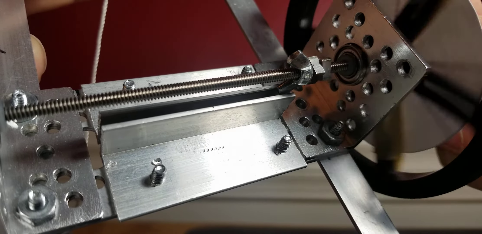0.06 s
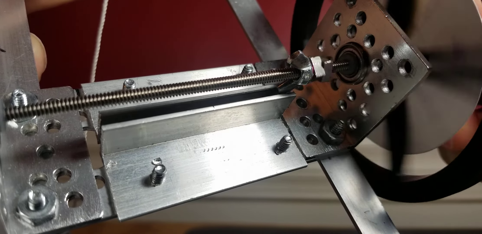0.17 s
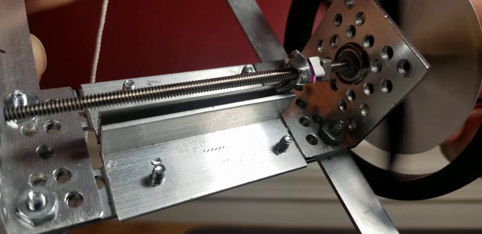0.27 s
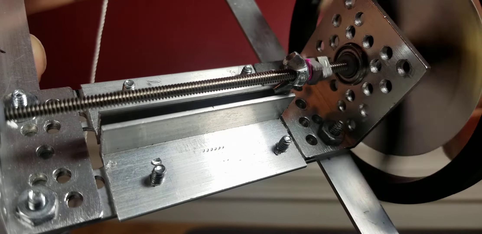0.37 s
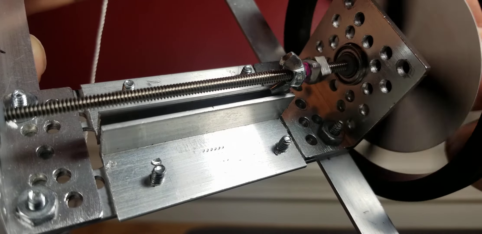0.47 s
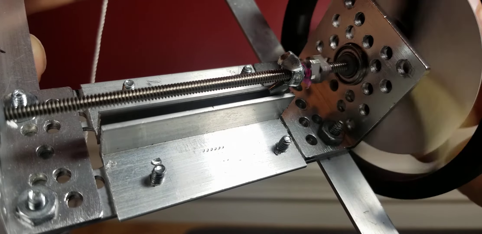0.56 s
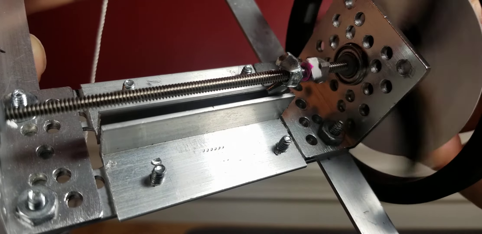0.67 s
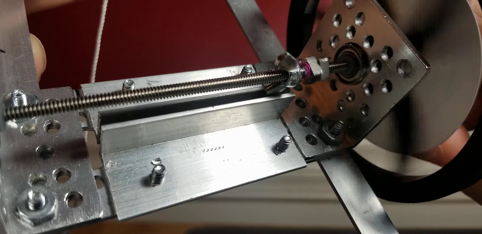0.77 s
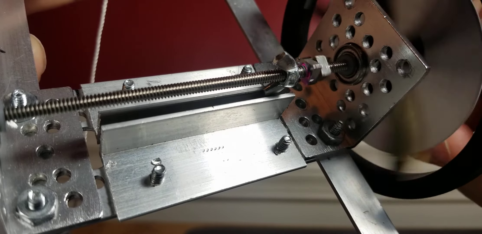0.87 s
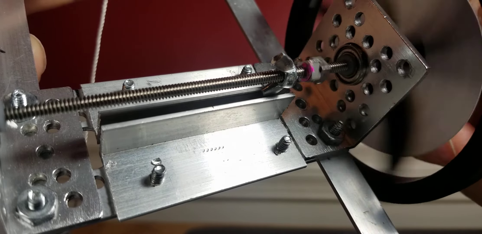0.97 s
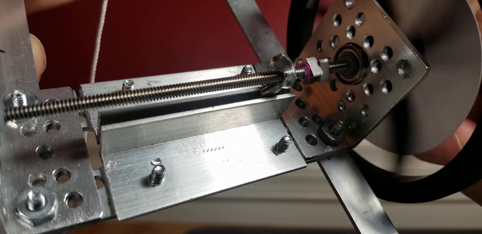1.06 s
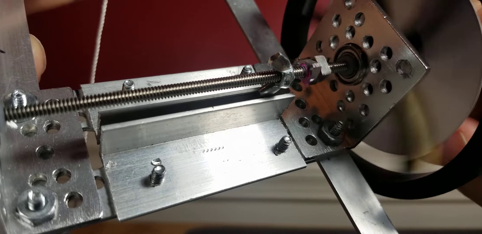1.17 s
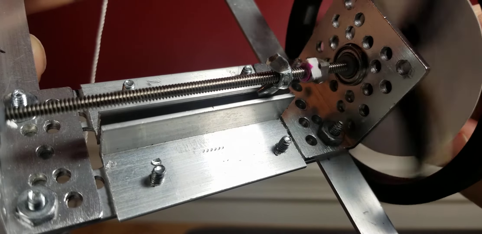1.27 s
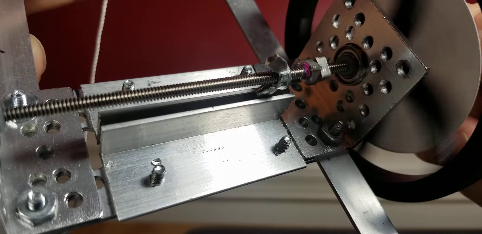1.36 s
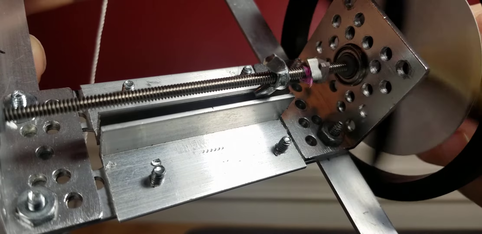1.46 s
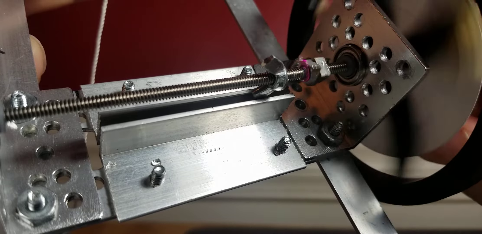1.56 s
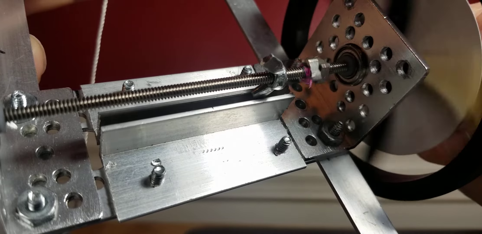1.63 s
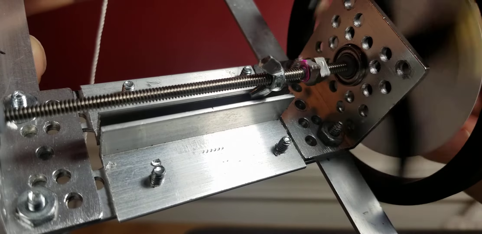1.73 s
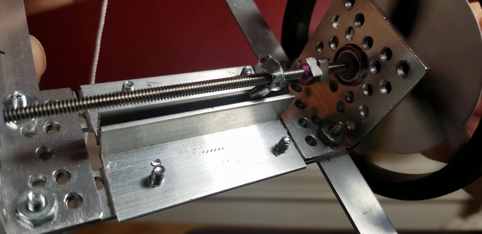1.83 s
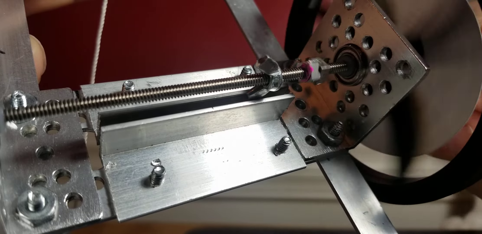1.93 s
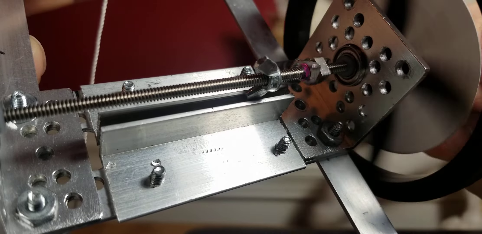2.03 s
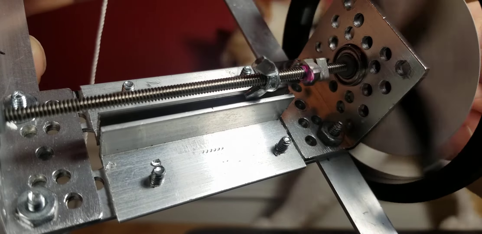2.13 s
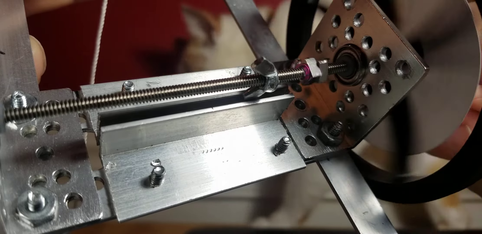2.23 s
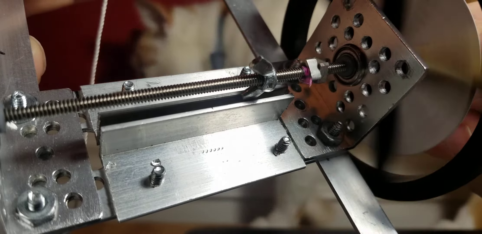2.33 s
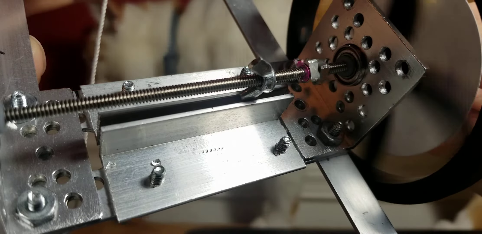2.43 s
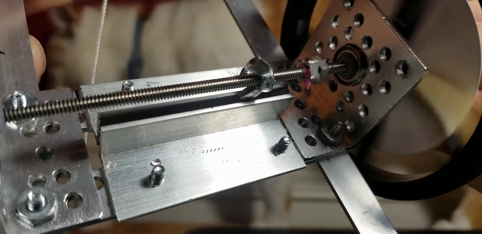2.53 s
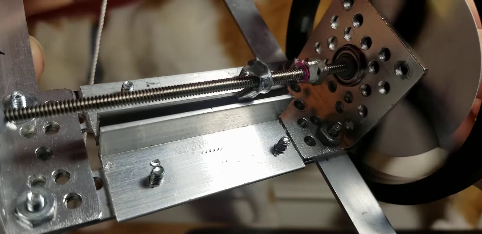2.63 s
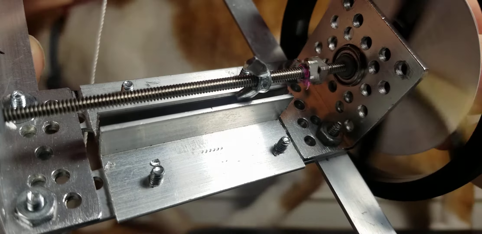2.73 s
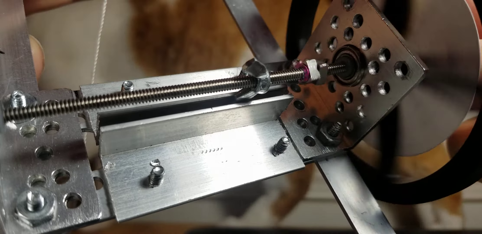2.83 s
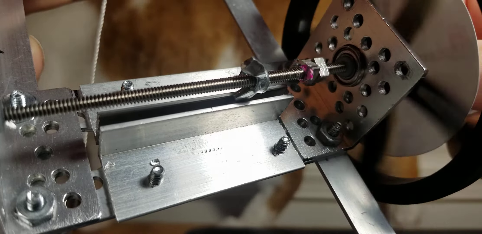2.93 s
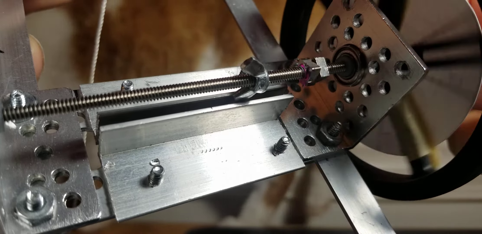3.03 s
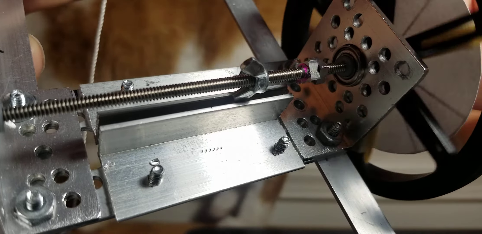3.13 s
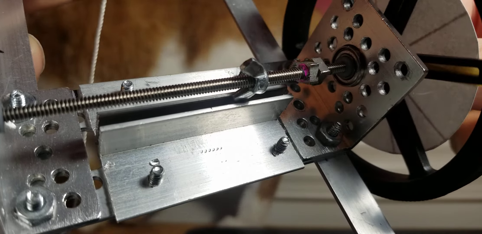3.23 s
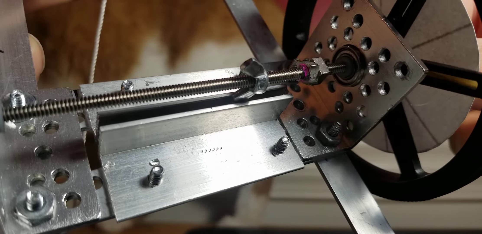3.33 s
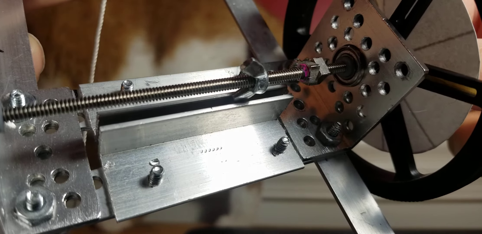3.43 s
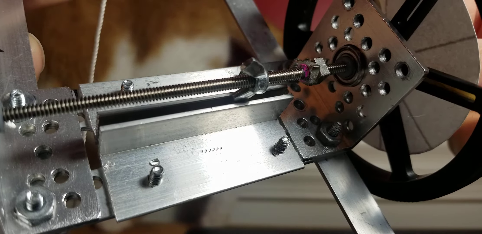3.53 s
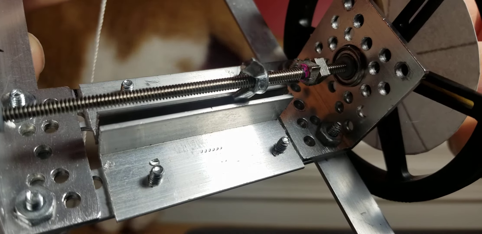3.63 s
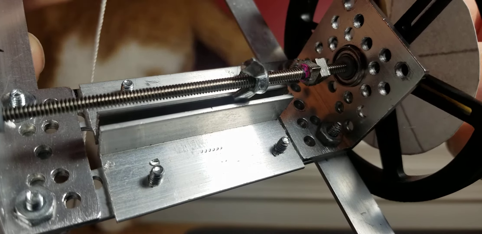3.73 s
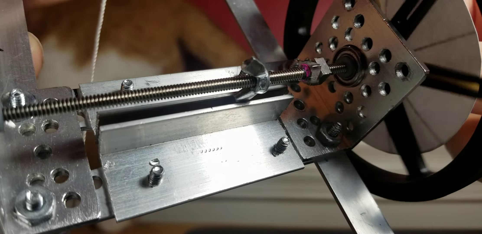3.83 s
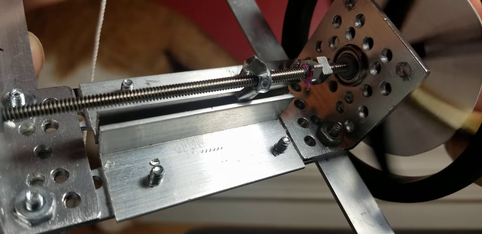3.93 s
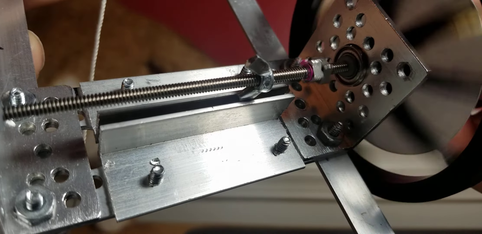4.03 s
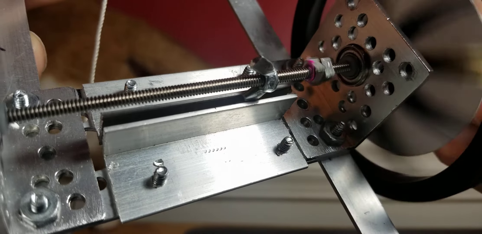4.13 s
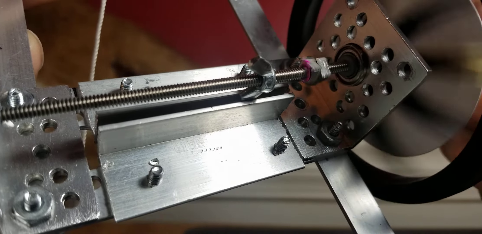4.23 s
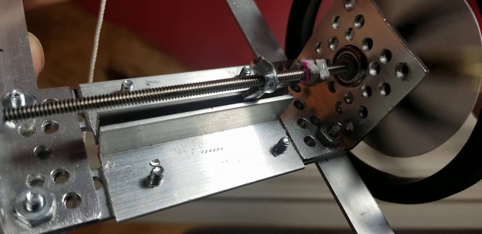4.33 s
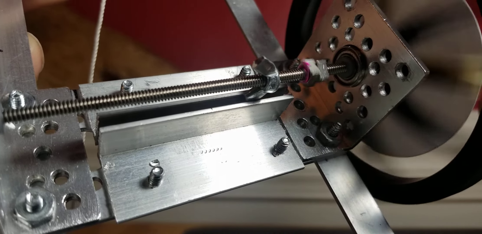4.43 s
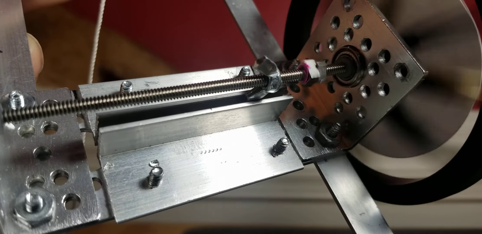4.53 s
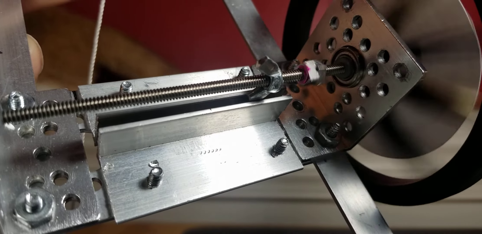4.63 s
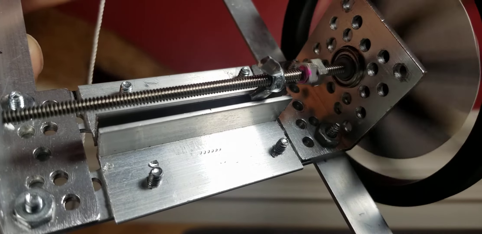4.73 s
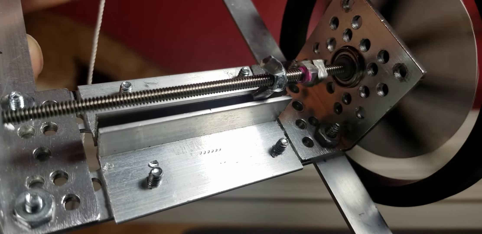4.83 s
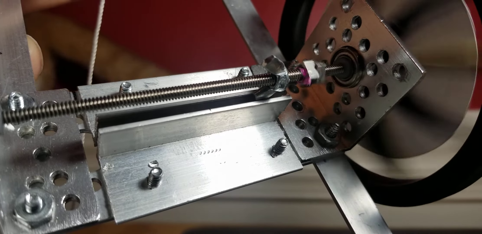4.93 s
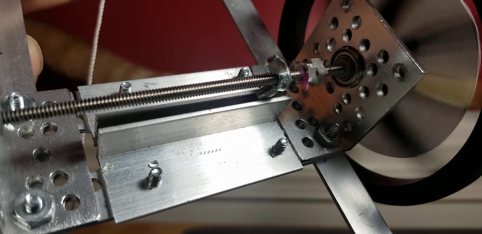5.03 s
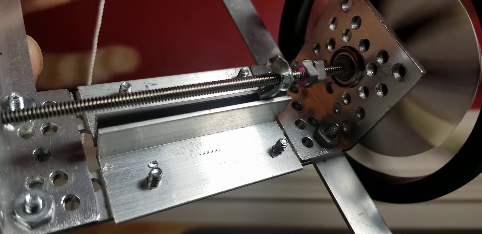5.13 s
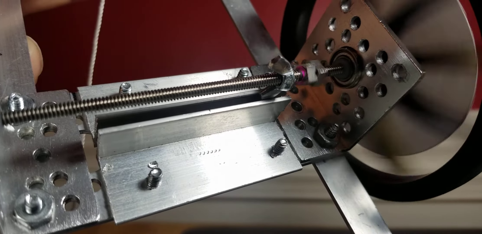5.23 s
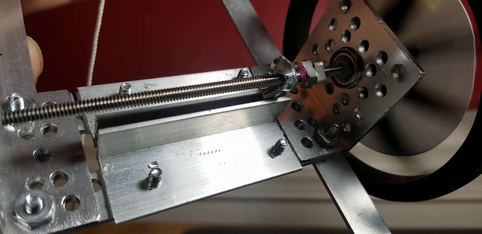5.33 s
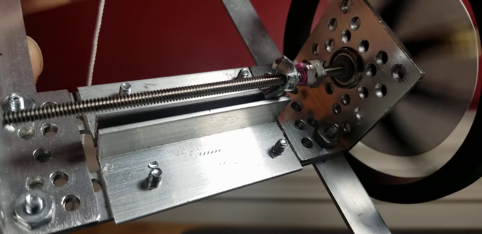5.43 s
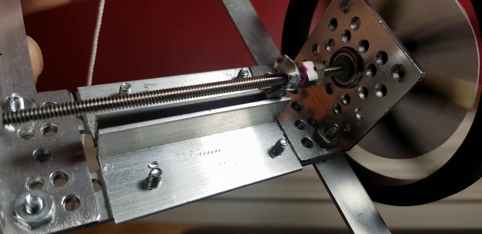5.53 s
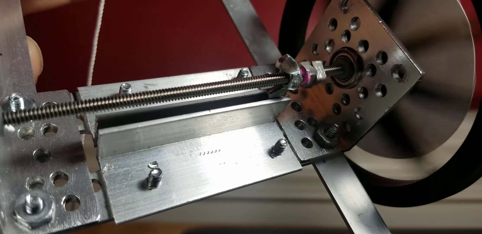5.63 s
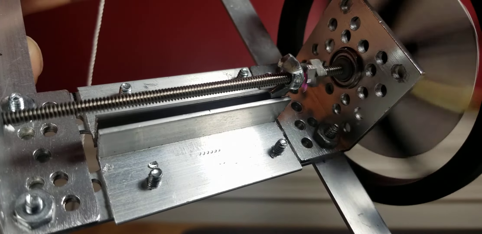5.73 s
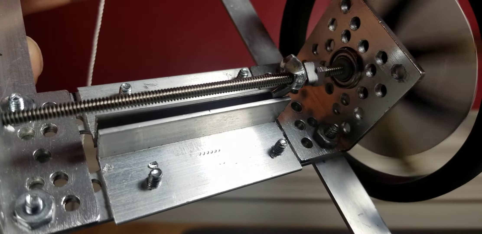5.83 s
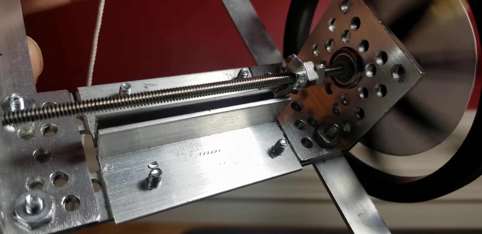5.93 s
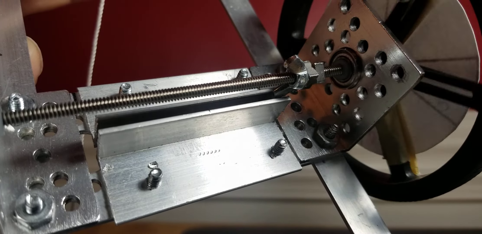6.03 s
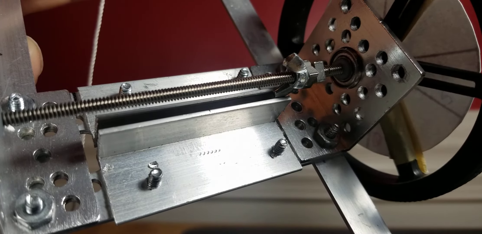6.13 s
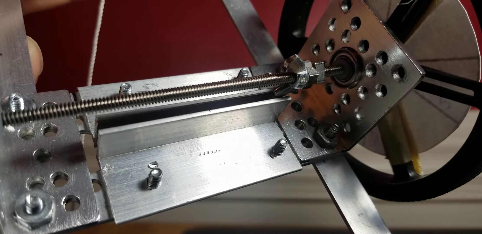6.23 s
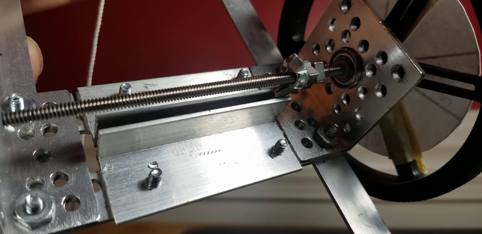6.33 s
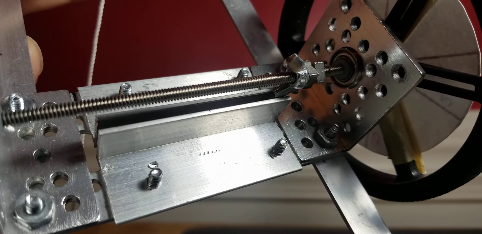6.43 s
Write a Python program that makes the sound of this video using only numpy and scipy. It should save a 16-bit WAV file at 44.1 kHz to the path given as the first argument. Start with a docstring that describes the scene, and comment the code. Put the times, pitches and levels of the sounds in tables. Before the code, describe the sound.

A small wheel and threaded axle whirr in their bearings, close to the microphone in a small indoor space. After handling thumps and light ticks comes a dense metal rattle of just over a second, then softer coasting with sharp clicks. After a near-still pause, friction noise glides down and a second, longer rattle runs in broken bursts before becoming continuous. It stops abruptly, with a double-tick knock and quiet.

```python
"""Indoors and close by, in stereo, a small wheel on a threaded rod spins one way, stops, and spins back.
A loose nut strikes the thread in trains of blows that ring the metal frame; sharp ticks ring it too.
Bearings hiss and whirr as filtered noise, friction noise glides between the spins, and the hand-held
rig rumbles as resonant noise and thumps as dying low swings. A knock follows the last spin.
Sparse echoes return the metal sounds over soft air hiss, a faint room floor and a thin high whine."""
import sys
import numpy as np
from scipy import signal
from scipy.fft import rfft, irfft
from scipy.io import wavfile
from scipy.ndimage import uniform_filter1d

SR = 44100
rng = np.random.default_rng(int(sys.argv[2]) if len(sys.argv) > 2 else 0)


def generate_wav(sig):
    """Save sig (samples, or channels by samples) to the path in sys.argv[1] as 16-bit PCM at SR."""
    pcm = np.round(np.clip(np.atleast_2d(sig).T, -1, 1) * 32767).astype(np.int16)
    wavfile.write(sys.argv[1], SR, pcm)


def decibels_to_gain(level_db):
    """Convert a level in decibels to a linear amplitude gain (20 dB per decade)."""
    exponent = np.asarray(level_db, float) / 20
    return 10 ** exponent


N = 286209  # samples
TURN_BACK_S = 3.5  # forward settings before, back settings after

# room floor spectrum: frequency_hz, relative_db
FLOOR_COLOUR = [(300, -9.5), (900, -23), (5000, -29), (9500, -31.5), (12500, -17.5), (16000, -22.5)]
FLOOR_DB = -82
# faint high whine, one list for each stretch: time_s, pitch_hz, level_db
WHINE_PATHS = [
    [(0, 13300, -80), (.73, 13280, -79)],
    [(6.1, 13520, -92), (6.49, 13640, -90)],
]
# soft background hiss, swelling in and dying at the end: time_s, relative level_db
AIR_HISS = [(0, -67), (.32, -59.5), (.73, -60.5), (2.8, -60.5), (3.3, -58.5), (3.85, -65), (5.88, -56),
            (5.97, -67), (6.07, -64), (6.22, -86), (6.49, -100)]
# spectrum of the soft background hiss: frequency_hz, relative_db
AIR_COLOUR = [(350, -46.5), (600, -1.5), (834, -30), (944, -10), (1550, -9.5), (2720, -6), (3250, -8),
              (4200, -2.5), (5710, 1), (9110, -7), (16000, -9)]
# unsteadiness of the hand: time_s, level_db
HAND = [(0, -43), (.14, -48), (.4, -54), (.6, -50), (1.0, -44), (1.25, -48), (1.48, -53), (1.65, -44),
        (1.85, -56), (2.33, -54), (2.6, -59), (3.1, -62), (3.75, -66), (4.05, -51), (4.35, -59), (4.7, -57),
        (5.9, -54), (6.2, -68), (6.49, -80)]
# deep resonances of the hand-held rig: pitch_hz, width_hz, relative_db
DEEP_MODES = [(54.8, 5.3, 4), (91, 41, -10), (34.7, 22, -8)]
# body resonances of the hand-held rig: pitch_hz, width_hz, relative_db
BODY_MODES = [(131, 81, 2), (197.3, 9.3, -0.5), (300, 40, -6), (400, 25, -12.5), (527, 40, -24.5),
              (900, 980, -47.5)]
# rumble at a middling hand (STEADY_DB): forward and back levels, before the ear balance
STEADY_DB, DEEP_DB, BODY_DB = -55, (-53.5, -57), (-57.5, -56)
DEEP_FOLLOW, BODY_FOLLOW, LUMP_DB = .45, 1.05, 2.2  # dB per dB of hand (twice); rms of random lumps
DEEP_UNDER_HZ = 110  # thumps below this stir the deep part
SHAKE_DB, SHAKE_T60_S = -18, .5  # shaking left by a thump, relative to the thump
SCUFF_DB, SCUFF_T60_S = -52, .7  # the grip shifts at the start
# spectrum of the grip scuff: frequency_hz, relative_db
SCUFF_COLOUR = [(150, -30), (400, 0), (700, -2), (1500, -8), (3000, -15), (4000, -40), (16000, -60)]
# bearings under load: start_s, end_s, relative hiss level_db
LOADED_SPANS = [(.74, 1.995, -45), (3.938, 5.868, -44.5)]
LOAD_RISE_S, LET_GO_S = .02, .01
# how hard the shaft runs in its bearings: time_s, strength (its square scales the whirr)
SHAFT_RUN = [(0, .45), (.25, .5), (.44, .95), (.73, .8), (.8, 1.15), (1.8, 1.05), (2.0, .5), (2.98, .5),
             (3.28, .13), (3.75, .15), (3.93, .47), (4.06, 1.3), (4.5, .95), (5.83, 1.1), (5.9, .65),
             (6.07, .27), (6.2, .07)]
# spectrum of the bearing hiss under load: frequency_hz, relative_db
LOADED_COLOUR = [(350, -40), (600, -3), (834, -30), (1000, -10), (1400, -12), (2000, -8), (2720, -6),
                 (3300, -7), (4200, -4), (5710, 1.5), (9110, -7), (16000, -4.5)]
WHIRR_DB, GRIT_DB, FLUTTER_DB = -57.5, 2.0, 3.0  # whirr at strength 1; rms of slow level changes
# dull thumps through the rig: start_s, level_db, pitch_hz, t60_s, left_over_right_db
RIG_THUMPS = [(0.045, -34.5, 199, 0.2, 2.5), (0.001, -33, 50, 0.7, 0), (0.356, -25.5, 46.4, 0.22, 0.5),
              (0.478, -37, 163, 0.23, -2), (0.853, -22, 200.7, 0.06, 1), (1.553, -35, 139, 0.12, -3),
              (1.589, -29, 350, 0.07, 2), (1.619, -32, 201, 0.14, 4), (4.104, -30, 125, 0.11, -10),
              (4.123, -26.5, 58, 0.17, -11), (5.335, -18.5, 188, 0.051, 1), (5.369, -29, 197, 0.14, 3),
              (5.389, -28.5, 56.5, 0.14, -4), (5.42, -38, 59.2, 0.12, 0.5), (5.474, -21, 197.5, 0.09, 0),
              (5.508, -35.5, 178, 0.18, -1.0), (5.549, -42, 159, 0.11, 1), (5.908, -45.5, 315, 0.061, -6),
              (6.002, -27, 460, 0.05, 3.5), (6.02, -30.5, 103, 0.11, -6), (6.146, -44, 117, 0.084, -11)]
THUMP_RISE_S, RISE_CYCLES = .0042, .45  # deeper thumps swell longer
THUMP_RATTLE, HARD_DB, RATTLE_PER_DB = .15, -20, .017  # noise share at HARD_DB; softer thumps rattle more
# ticks of parts taking up play: start_s, level_db, left_over_right_db, dullness_db_per_octave
PLAY_TICKS = [(0.2115, -55, 14, 9), (0.2893, -45, 11, 3.5), (0.4208, -47, 10, 6), (0.445, -41, 12, 0),
              (0.485, -49, 7, 5), (0.5078, -43.5, 5, 8), (0.5701, -40.5, 14, 0.5), (0.631, -52, 9.5, 1),
              (0.6404, -41.5, 11, 2), (0.761, -27, 8, -1), (2.1694, -34.5, 7, -1.5), (2.2602, -43, 6, -2),
              (2.2784, -46, 3.0, 2.5), (2.3056, -43.5, 9, 3), (2.3554, -45.5, 7, 4.5),
              (2.5379, -41, 9, 3.5), (2.5436, -31, 7.5, 1), (2.6196, -32, 6, -4), (2.8075, -44, 4, 7.5),
              (2.8224, -41, -3, 5), (2.8345, -43.5, 8, 3.5), (2.8794, -47, 12, 5.5), (3.8018, -42, 4, 0),
              (3.903, -36, 7, 2), (6.0013, -28.5, 8, -2.5), (6.0107, -31, 6, 6), (6.0216, -37.5, -3, 4),
              (6.087, -48, 8, 3.5)]
# common spectrum of the ticks: frequency_hz, relative_db
TICK_SPECTRUM = [(400, -23), (1200, -15), (2500, -9.5), (4500, 0.5), (8600, -2), (11700, -6), (16000, -6)]
TICK_T60_S, DULL_T60_S_PER_DB = .025, .0015  # duller ticks scrape longer
# centre frequencies of the frame's modes: pitch_hz
MODE_HZ = [570, 1065, 1915, 2345, 2720, 4530, 4950, 5450, 6450, 7650, 8760, 9500, 10250, 10920, 11830,
           12850, 13400, 15650]
# excitation of each of those modes: width_hz, forward_relative_db, back_relative_db
MODE_SHAPE = [(86.4, -25, -17), (57.4, -12, -20.5), (120.37, -11, -19.5), (83.333, -7.5, -19.5),
              (108, -9.5, -9), (140, -10, -25), (170, -26.5, -5.5), (119, -8, -9), (315, 1, -7.5),
              (240, -5, -19.5), (300, -36.5, -10.5), (250, -14, -30), (400, -15, -11.5), (150, -12.5, -27),
              (176, -18, 3.5), (350, -15, -18), (200, -35, -14), (120, -23.5, -10.5)]
# dense unresolved modes between them: frequency_hz, forward_relative_db, back_relative_db
MODE_BED = [(300, -9, -64), (1300, -65, -35.5), (3150, -23.5, -33), (5740, -10.5, -19), (8440, -15.5, -29),
            (10500, -7.5, -18), (11400, -4.5, -10.5), (12760, -11, -13.5), (13800, -9, -19.5),
            (14500, -15, -12), (16600, -20, -12.5)]
# delay of the right ear behind the left: forward_samples, back_samples
EAR_LAG = 18, 4
# level difference of the frame's ring between the ears: frequency_hz, left_over_right_db
EAR_LEAN = [(60, -5), (180, -5.5), (550, 7), (1650, 5.5), (4970, 4), (15000, 12.5)]
# likeness of coloured noise at the two ears: frequency_hz, correlation
EAR_LIKENESS = [(60, 0.27), (240, 0.18), (950, -0.36), (3770, 0.1), (15000, -0.41)]
# how the nut bounces: time_s, rate_per_s, seat (0 forward flank - 1 back flank), rebound_share
NUT_BOUNCE = [(0.7, 166, 0.03, .55), (0.95, 181, 0.14, .25), (1.4, 174, 0.35, .35), (1.6, 184, 0.3, .9),
              (2.02, 169, 0.1, .5), (2.7, 210, 0.4, .7), (3.93, 197, 0.89, .7), (4.22, 200, 0.8, .9),
              (4.28, 210, 0.97, .35), (4.75, 180, 1, .2), (5.0, 200, 1, .2), (5.25, 166, .97, .9),
              (5.87, 173, 0.97, .35)]
# bursts of nut chatter: start_s, end_s, rise_s, first_level_db, last_level_db
CHATTER_BURSTS = [(0.736, 1.995, .045, -33, -36), (2.577, 2.591, .004, -40.5, -40),
                  (2.763, 2.799, .012, -42, -40), (3.939, 4.112, .06, -32.5, -30),
                  (4.153, 4.218, .008, -31.5, -33), (4.248, 4.372, .012, -27, -31),
                  (4.398, 4.464, .003, -28, -32), (4.499, 5.864, .004, -28, -34)]
RISE_FROM_DB = -8  # a burst starts this far below its first level
# moments when the nut briefly lifts off the thread: centre_s, length_s, dip_db
NUT_SKIPS = [(1.107, .04, -5), (1.477, .12, -6), (5.15, .04, -4), (5.252, .016, -11), (5.279, .026, -11),
             (5.756, .04, -3)]
# forward and back: timing scatter (share of a cycle), size scatter (dB), rig buzz over chatter (dB)
SCATTER, SPREAD_DB, BUZZ_DB = (.05, .14), (2.3, .5), (-17, -30)
BUZZ_FADE_DB_PER_S, BUZZ_WAVER_DB = -6, 4.0  # the grip tightens after each spin starts
# decay of the room's echoes: frequency_hz, t60_s
ROOM_DECAY = [(300, .5), (2000, 0.17), (6000, 0.38), (15000, 0.18)]
# friction noise, sinking with the wheel's speed, swelling as it starts back:
# time_s, pitch_hz, width_hz, level_db
RUB_PATH = [(2.85, 2100, 250, -90), (3.1, 1950, 250, -79), (3.45, 1544, 200, -77), (3.8, 1480, 200, -74.5),
            (3.86, 3020, 300, -88), (3.88, 2940, 900, -57), (3.93, 2770, 802, -47.5), (4.0, 2684, 607, -46),
            (4.1, 2650, 400, -52)]
EDGE_HZ = 15790  # upper band limit


def evened(x):
    """Normalisation: a signal divided by its root mean square has rms 1."""
    return x / np.sqrt(np.mean(x ** 2) + 1e-20)


def read(points, hz, column=1):
    """Logarithmic frequency scale: a spectrum column is interpolated along log frequency."""
    rows = np.array(points)
    return np.interp(np.log(hz + 1), np.log(rows[:, 0] + 1), rows[:, column])


def curve(rows, column=1):
    """Linear interpolation: a control column is read at every sample."""
    rows = np.array(rows)
    return np.interp(np.arange(N) / SR, rows[:, 0], rows[:, column])


def lumps(size):
    """Random modulation: white noise averaged twice over size samples drifts slowly, at rms 1."""
    once = uniform_filter1d(rng.standard_normal(N), size=size)
    return evened(uniform_filter1d(once, size=size))


def pair(shared):
    """Interaural correlation: white noise partly shared by the ears."""
    a, b = rng.standard_normal((2, N))
    shared = np.clip(shared, 0, 1)
    return np.array([a, shared * a + np.sqrt(1 - shared ** 2) * b])


def noise(points):
    """Spectral shaping: random short-time spectra give coloured, patchy stereo noise of rms 1."""
    frames, hz = N // 256 + 5, np.fft.rfftfreq(1024, 1 / SR)
    a, b, c, d, patches = rng.standard_normal((frames, 513, 5)).T
    patches = uniform_filter1d(patches, size=10, axis=0)
    patches = evened(uniform_filter1d(patches, size=10, axis=1))
    same = np.clip(read(EAR_LIKENESS, hz), -1, 1)[:, None]
    left = a + 1j * b
    right = same * left + np.sqrt(1 - same ** 2) * (c + 1j * d)
    spectra = np.array([left, right]) * decibels_to_gain(read(points, hz)[:, None] + .8 * patches)
    return evened(signal.istft(spectra, nperseg=1024, noverlap=768)[1][:, :N])


def band(hz, width, shared):
    """Heterodyning: slow noise, read faster for a wider band, is carried up to a moving centre."""
    lowpass = signal.butter(2, 250, fs=SR, output="sos")
    slow = signal.sosfilt(lowpass, pair(shared) + 1j * pair(shared))
    place = np.cumsum(width * np.ones(N) / 500) % (N - 1)
    slow = np.array([np.interp(place, np.arange(N), ear) for ear in slow])
    carrier = np.exp(2j * np.pi * np.cumsum(hz) / SR)
    return evened((slow * carrier).real)


def peaks_db(modes, hz):
    """Superposition of resonances: the powers of bell-shaped peaks add, in dB."""
    power = sum(decibels_to_gain(2 * db) / (1 + (2 * (hz - f) / width) ** 2) ** 1.343 for f, width, db in modes)
    return 10 * np.log10(power)


def causal(db):
    """Minimum phase: the most prompt causal response with the given dB on 2049 bins."""
    log = np.log(decibels_to_gain(np.r_[db, db[-2:0:-1]]))
    return np.fft.ifft(np.exp(log - 1j * signal.hilbert(log).imag)).real[:2048]


def room_floor():
    """Stationary noise: a steady, faint, coloured hiss fills the room."""
    return decibels_to_gain(FLOOR_DB) * noise(FLOOR_COLOUR)


def whine():
    """Narrow-band noise: a fuzzy high tone before the first spin and again at the end."""
    out, t = 0, np.arange(N) / SR
    for rows in WHINE_PATHS:
        inside = uniform_filter1d(1. * (t > rows[0][0]) * (t < rows[-1][0]), size=2000)
        out = out + decibels_to_gain(curve(rows, column=2)) * inside * band(curve(rows), 150, .5)
    return out


def air_hiss():
    """Broadband noise: a soft background hiss under an envelope that swells in and dies at the end."""
    return decibels_to_gain(np.c_[[3.0, 1.0]]) * decibels_to_gain(curve(AIR_HISS)) * noise(AIR_COLOUR)


def rumble():
    """Forced resonance: noise from hand and unbalanced wheel rings the rig; thumps stir it."""
    hz, t, out = np.fft.rfftfreq(N, 1 / SR), np.arange(N) / SR, 0
    lowcut = hz ** 4 / (hz ** 4 + 38 ** 4)
    parts = ((True, DEEP_MODES, 0.44, DEEP_DB, DEEP_FOLLOW),
             (False, BODY_MODES, 0.42, BODY_DB, BODY_FOLLOW))
    for deep, modes, shared, level_db, follow in parts:
        ring = irfft(rfft(pair(shared)) * decibels_to_gain(peaks_db(modes, hz)) * lowcut, N)
        hand_db = np.where(t > TURN_BACK_S, level_db[1], level_db[0])
        hand_db = hand_db + follow * (curve(HAND) - STEADY_DB) + LUMP_DB * lumps(size=3000)
        stirred = np.zeros(N)
        for start, db, pitch, *_ in RIG_THUMPS:
            if (pitch < DEEP_UNDER_HZ) == deep:
                stirred += decibels_to_gain(db + SHAKE_DB - 60 * abs(t - start) / SHAKE_T60_S) * (t > start)
        out = out + (decibels_to_gain(hand_db) + uniform_filter1d(stirred, size=800)) * evened(ring)
    scuff = decibels_to_gain(SCUFF_DB - 60 * t / SCUFF_T60_S) * noise(SCUFF_COLOUR)
    return decibels_to_gain(np.c_[[-0.5, 3.0]]) * out + scuff


def bearings():
    """Rolling contact: gritty hiss under load, and a fluttering whirr that excites low frame modes."""
    t, load = np.arange(N) / SR, 0
    for start, end, db in LOADED_SPANS:
        rise = np.clip((t - start) / LOAD_RISE_S, 0, 1)
        load = load + decibels_to_gain(db) * rise * np.clip(1 + (end - t) / LET_GO_S, 0, 1)
    hiss = load * decibels_to_gain(GRIT_DB * lumps(size=400)) * noise(LOADED_COLOUR)
    low_band = signal.butter(3, [700, 3300], "band", fs=SR, output="sos")
    soft = signal.sosfilt(low_band, pair(0.3))
    whirr = evened(signal.oaconvolve(soft, frame(False), axes=1)[:, :N])
    whirr_level = decibels_to_gain(WHIRR_DB + FLUTTER_DB * lumps(size=1500)) * curve(SHAFT_RUN) ** 2
    return decibels_to_gain(np.c_[[3.0, 1.0]]) * hiss + whirr_level * whirr


def thumps():
    """Damped oscillation: a dying low swing with a faster-dying overtone and a puff of low noise."""
    out, t = np.zeros((2, N + 16000)), np.arange(16000) / SR
    for start, db, hz, t60, pan in RIG_THUMPS:
        rise = THUMP_RISE_S + RISE_CYCLES / hz
        rattle = THUMP_RATTLE + RATTLE_PER_DB * (HARD_DB - db)
        overtone = 0.17 * np.sin(2 * np.pi * 2.0 * hz * t) * decibels_to_gain(-60 * t / t60)
        swing = np.sin(2 * np.pi * hz * t) + overtone
        low = signal.butter(3, 2.19 * hz, fs=SR, output="sos")
        puff = evened(signal.sosfilt(low, rng.standard_normal((2, 16000))))
        shape = decibels_to_gain(db - 60 * np.maximum(t - rise, 0) / t60) * np.minimum(t / rise, 1)
        sound = (swing + rattle * puff) * shape * decibels_to_gain(np.c_[[pan / 2, -pan / 2]])
        out[:, round(start * SR):][:, :16000] += sound
    return out[:, :N]


def frame(back):
    """Modal response: the frame's ring at both ears, later and duller at the right, mean of rms 1."""
    hz = np.fft.rfftfreq(4096, 1 / SR)
    modes = [(f, row[0], row[1 + back]) for f, row in zip(MODE_HZ, MODE_SHAPE)]
    power = decibels_to_gain(2 * peaks_db(modes, hz)) + decibels_to_gain(2 * read(MODE_BED, hz, 1 + back))
    db = 10 * np.log10(power)
    lean = read(EAR_LEAN, hz) / 2
    left, right = causal(db + lean), causal(db - lean)
    # unit energy of the mean response keeps white noise at rms 1
    return np.array([left, np.roll(right, EAR_LAG[back])]) / np.linalg.norm(left + right) * 2


def ticks():
    """Impulsive excitation: a sharp crack and short scrape of varied brightness partly ring the frame."""
    out, t, hz = np.zeros((2, N + 8192)), np.arange(4096) / SR, np.fft.rfftfreq(4096, 1 / SR)
    ring = frame(False)
    ring = ring / np.linalg.norm(ring, axis=1, keepdims=True)
    colour = causal(read(TICK_SPECTRUM, hz))
    both = colour / np.linalg.norm(colour) + 0.92 * ring
    for start, db, pan, dull_db in PLAY_TICKS:
        t60 = TICK_T60_S + DULL_T60_S_PER_DB * dull_db
        burst = rng.standard_normal((2, 4096))
        burst[1] = .7 * burst[0] + .7 * burst[1]
        scrape = decibels_to_gain(-60 * t / t60) * np.minimum(t / 0.00087, 1)
        crack = 1.3 * decibels_to_gain(-60 * t / 0.0018)
        burst *= scrape + crack
        tilt = causal(-dull_db * np.log2(np.maximum(hz, 1500) / 6000))[None, :256]
        sound = signal.fftconvolve(burst, tilt, axes=1)
        sound = signal.fftconvolve(sound, both, axes=1)
        gain = decibels_to_gain(db - 6.0 + np.c_[[pan / 2, -pan / 2]])
        out[:, round(start * SR):][:, :sound.shape[1]] += gain * sound
    return out[:, :N]


def burst_level():
    """Amplitude envelope: each burst rises, drifts in level and lets go; skips dent it."""
    level, t = np.zeros(N), np.arange(N) / SR
    for start, end, rise, first_db, last_db in CHATTER_BURSTS:
        db = np.interp(t, [start, start + rise, end], [first_db + RISE_FROM_DB, first_db, last_db])
        level += decibels_to_gain(db) * (t > start) * np.clip(1 + (end - t) / LET_GO_S, 0, 1) ** 2
    dips_db = sum(db * np.clip(1 - abs(t - s) * 2 / length, 0, 1) for s, length, db in NUT_SKIPS)
    return level * decibels_to_gain(dips_db)


def nut_blows(way):
    """Repeated impact: each bounce cycle holds a blow and a weaker rebound, scattered in time and size."""
    rate, rebound = curve(NUT_BOUNCE), curve(NUT_BOUNCE, column=3)
    scatter, spread_db = np.array([SCATTER, SPREAD_DB])[:, way]
    halves = np.cumsum(2 * rate) / SR
    at = np.flatnonzero(np.diff(np.floor(halves)))
    late, size = np.clip(rng.standard_normal((4000, 2))[:len(at)].T, -2, 2)
    is_blow = np.floor(halves[at]) % 2
    size = decibels_to_gain(spread_db[at] * size) * np.where(is_blow, 1, np.clip(rebound[at], 0, 1))
    at = (at + late * scatter[at] * SR / rate[at]).astype(int)
    blows = np.zeros(N)
    np.add.at(blows, np.clip(at, 0, N - 1), size)
    return blows


def chatter():
    """Impact excitation: nut blows, each a short scrape, ring the frame and buzz in the rig."""
    t = np.arange(N) / SR
    way = 1 * (np.arange(N) > TURN_BACK_S * SR)
    blows, level = nut_blows(way), burst_level()
    fall, rise = np.exp(-1 / (.001 * SR)), np.exp(-1 / (.0002 * SR))
    scrape = signal.lfilter([1 - rise], np.convolve([1, -fall], [1, -rise]), blows) + .06  # plus steady rub
    scrape /= np.sqrt(uniform_filter1d(scrape ** 2, size=4000))
    # the chatter's strength wavers slowly at random
    wobble = decibels_to_gain(1.0 * evened(uniform_filter1d(rng.standard_normal(N), size=1500)))
    drive = level * wobble * scrape * pair(.7)
    seat = np.clip(curve(NUT_BOUNCE, column=2), 0, 1)
    forward = signal.oaconvolve(drive * np.sqrt(1 - seat ** 2), frame(False), axes=1)
    back = signal.oaconvolve(drive * seat, frame(True), axes=1)
    # the same blows push the rig, so the bounce rate and its overtones hum in the bass
    push = signal.sosfilt(signal.butter(3, [160, 520], "band", fs=SR, output="sos"), blows)
    since_start = np.clip(t - np.array(LOADED_SPANS)[way, 0], 0, 2)
    buzz_db = np.array(BUZZ_DB)[way] + BUZZ_WAVER_DB * lumps(size=1200)
    buzz_db = buzz_db + BUZZ_FADE_DB_PER_S * since_start
    buzz = decibels_to_gain(buzz_db + np.c_[[-2.0, 2.0]]) * level * evened(push)
    return (forward + back)[:, :N] + buzz


def room(x):
    """Reverberation: sparse echoes of random sign, each band dying at its own speed."""
    taps = np.zeros((2, SR // 2))
    jitter = rng.integers(0, 20, (2, (SR // 2 - 151) // 20))
    at = np.arange(150, SR // 2 - 20, 20) + jitter
    np.put_along_axis(taps, at, rng.choice([-1., 1.], at.shape), 1)
    hz, t, spectra = signal.stft(taps, SR, nperseg=256)
    decay = decibels_to_gain(-60 * t / read(ROOM_DECAY, hz)[:, None])
    tail = signal.istft(spectra * decay, SR, nperseg=256)[1]
    return signal.fftconvolve(x, tail / np.linalg.norm(tail[0]), axes=1)[:, :N]


def rub():
    """Sliding friction: a soft noise band whose centre, width and level follow the wheel."""
    t = np.arange(N) / SR
    inside = (t > RUB_PATH[0][0]) * (t < RUB_PATH[-1][0])
    sound = band(curve(RUB_PATH, column=1), curve(RUB_PATH, column=2), 0.18)
    return decibels_to_gain(curve(RUB_PATH, column=3)) * inside * sound


def scene():
    """Superposition: all sources add; the metal sounds also come back from the room."""
    metal = chatter() + ticks()
    rig = thumps() + bearings() + rub() + rumble()
    background = air_hiss() + room_floor() + whine()
    return metal + decibels_to_gain(-14.0) * room(metal) + rig + background


def low_pass(x):
    """Removes everything above the highest recorded frequency."""
    return signal.sosfilt(signal.butter(12, 16950, fs=SR, output="sos"), x)


def record(dry):
    """Band limiting: a linear-phase low-pass removes the highest treble from the finished mix."""
    edge = signal.firwin(1001, EDGE_HZ, window=("kaiser", 8), fs=SR)[None]
    mix = signal.oaconvolve(dry, edge, "same", axes=1)
    return low_pass(mix)


dry = scene()
out = record(dry)
generate_wav(out)
```